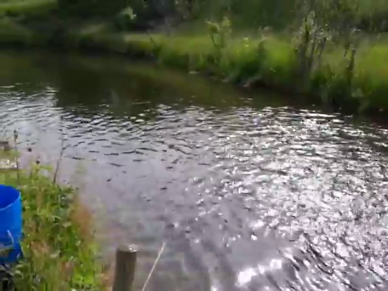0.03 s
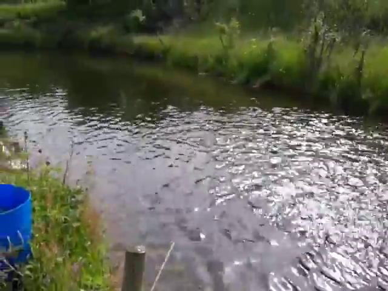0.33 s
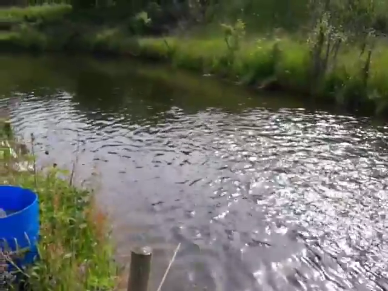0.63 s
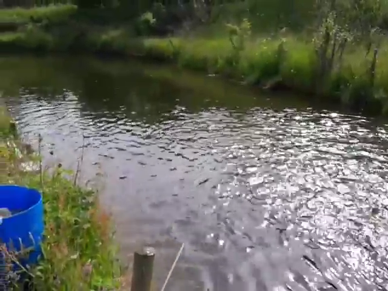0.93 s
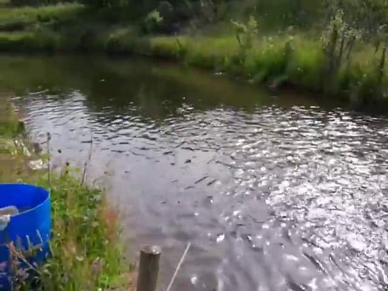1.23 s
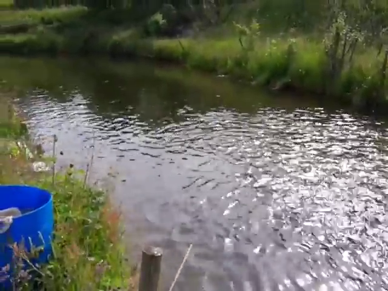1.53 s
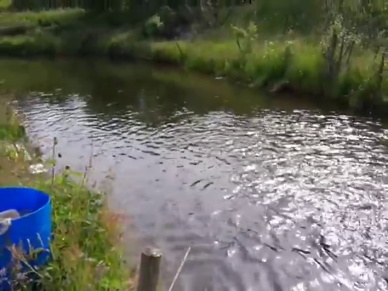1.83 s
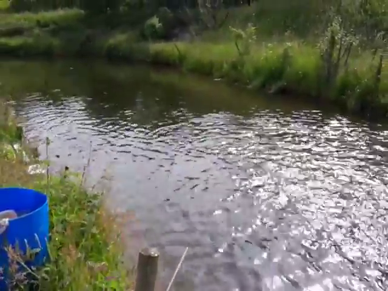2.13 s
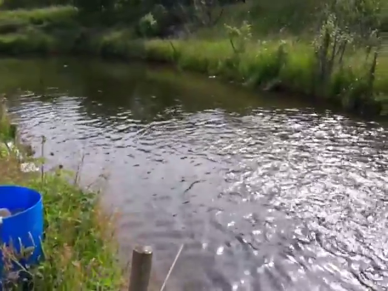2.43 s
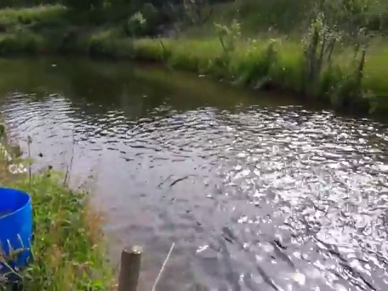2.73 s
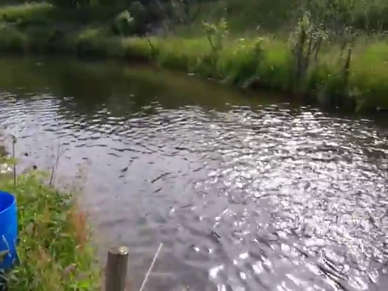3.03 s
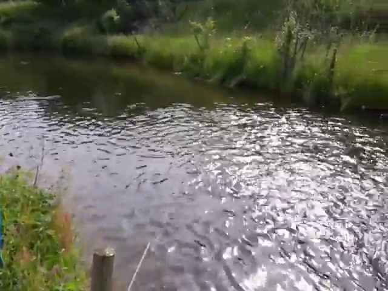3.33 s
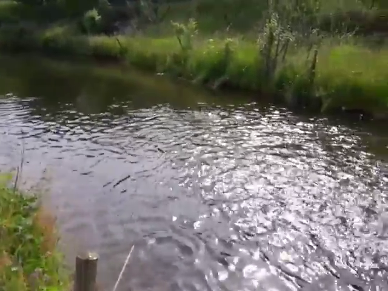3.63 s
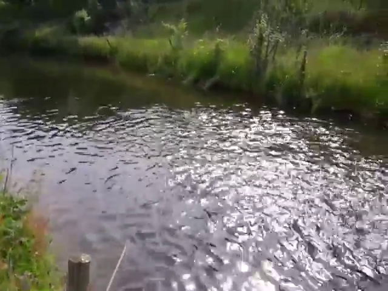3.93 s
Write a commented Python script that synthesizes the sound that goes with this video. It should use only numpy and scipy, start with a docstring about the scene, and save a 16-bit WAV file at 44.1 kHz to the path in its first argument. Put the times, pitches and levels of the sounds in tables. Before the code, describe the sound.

A steady rush of splashing water comes from an aerator on the right of an outdoor pond. Its motor drones underneath with occasional soft gurgles, while wind rumbles on the left of the microphone, thumping early and again near the end.

```python
"""By a pond in the open air, stereo microphone, a paddlewheel aerator off to the right.
From the start its spray and bubbles rush steadily, bright hiss on top, the drive humming underneath.
Air pockets dragged under by the paddles gurgle through the first second. A breeze buffets mostly the
left side of the microphone, thumping around 1 s and hardest near 1.7 s. The gurgles return from 2.2 s,
and the wind thumps once more near 3.5 s while the wheel churns on."""
import sys
import numpy as np
from scipy import signal
from scipy.fft import rfft, irfft
from scipy.io import wavfile

SR = 44100
rng = np.random.default_rng(int(sys.argv[2]) if len(sys.argv) > 2 else 0)


def materialize(psi):
    """Save the field psi as 16-bit PCM at rate SR to the path in sys.argv[1].

    A 1-D psi becomes a single channel; in a 2-D psi each row is a channel.
    """
    bounded = np.clip(np.atleast_2d(psi).T, -1, 1)
    quanta = np.round(bounded * 32767).astype(np.int16)
    wavfile.write(sys.argv[1], SR, quanta)


N = 176400
TIME = np.arange(N) / SR
BIN_HZ = np.maximum(np.arange(N // 2 + 1) * SR / N, 1)

# Churning water on the right of the microphone. Each row: frequency in Hz, relative level in dB.
WATER_SPECTRUM = [(40, -71), (120, -58.5), (240, -56.5), (300, -57), (375, -56.5), (480, -60), (560, -64.5),
                  (660, -65.5), (810, -63), (950, -63.5), (1200, -63.5), (1620, -66.5), (2150, -65),
                  (2900, -69), (4000, -71.5), (4550, -68), (5100, -68.5), (6000, -73.5), (7400, -74),
                  (8500, -63.5), (9400, -53), (10050, -49.5), (11000, -56), (13300, -63.5), (15600, -67)]
# The left side faces away from the wheel. Each row: frequency in Hz, level against the right in dB.
LEFT_SHADOW = [(200, -0.5), (370, -2.2), (540, 1), (950, -0.5), (1650, 2.0), (2000, -2.5), (2420, -12.5),
               (2850, -2.5), (3500, 1), (4000, -1), (4850, -15), (6000, -6), (7200, -3), (7700, -4),
               (8100, -13.5), (10000, -13.5), (11500, -8.5), (12400, -10.5), (13200, -9), (14200, -8),
               (15600, -7)]
# The path round the microphone body to its left side. Each row: frequency in Hz, phase turn in radians.
LEFT_PHASE = [(250, -0.14), (430, 0.56), (620, 0.07), (1500, -0.13), (2380, -2), (2460, 1.3), (2850, 0.89),
              (3300, 0.2), (3700, 0.03), (4600, -1.26), (5300, 1.4), (6700, 1.2), (7700, -1.8), (8300, 3),
              (9200, 1), (10300, 0.8), (11800, 0.7), (14000, -1.5)]
# Water sound common to both sides. Each row: frequency in Hz, share of the power from 0 to 1.
COMMON_SHARE = [(150, 0.3), (240, 0.89), (370, 0.93), (600, 0.79), (1000, 0.85), (1320, 0.97), (1650, 0.86),
                (2150, 0.69), (2420, 0.04), (2650, 0.24), (3100, 0.82), (3600, 0.5), (4020, 0.89),
                (4400, 0.72), (6200, 0.12), (7050, 0.42), (8000, 0), (9700, 0.23), (15000, 0)]
# Large air pockets under the paddles. Each row: time in seconds, peak level in dB, starting pitch in Hz.
AIR_POCKETS = [(.249, -24, 463), (.452, -25, 409), (.672, -29, 470), (0.76, -21.5, 377), (0.962, -24, 400),
               (1.079, -24.5, 430), (2.187, -21.5, 368), (2.798, -28, 383), (2.912, -25.5, 421),
               (3.398, -28, 383), (3.745, -29, 446)]
# The motor's hum. Each row: frequency in Hz, level on the left in dB, level on the right in dB.
HUM_LINES = [(101, -45, -40.5), (195.2, -48, -43.5), (600, -61, -58)]
# The gear drone on the right. Each row: time in seconds, level in dB.
DRONE_LEVEL = [(0, -44.5), (.33, -36.5), (.57, -34), (.8, -39.5), (1.25, -37), (1.45, -44), (1.62, -36),
               (2.0, -39), (2.22, -35), (2.55, -33), (2.7, -38), (2.93, -38), (3.05, -49), (3.4, -37),
               (3.68, -50), (3.82, -37), (4, -40)]
# Wind on the microphone's left port. Each row: time in seconds, level in dB.
LEFT_BREEZE = [(0, -33), (.25, -28), (.66, -29), (.73, -25.5), (.84, -28.5), (.92, -25.5), (1.02, -27),
               (1.16, -25), (1.38, -31), (1.5, -22.5), (1.6, -22), (1.65, -16), (1.77, -21), (1.8, -27.5),
               (2.3, -31), (2.58, -27.5), (2.85, -33), (3.15, -30), (3.6, -29.5), (3.85, -26.5), (4, -33)]
# Single eddies hitting the left port. Each row: time in seconds, peak level in dB, pitch in Hz.
EDDY_THUMPS = [(0.761, -8, 129), (0.892, -11, 107), (1.051, -11.5, 102), (1.667, -11, 131),
               (1.732, -6, 125), (1.766, -8, 139), (3.468, -7.5, 133), (3.508, -15.5, 115)]

WATER_DB, LEFT_LAG_MS = -18, 0.3637
SURGE_DB, SURGE_PER_S = 0.72, 1.8   # the wheel throws more or less water
SLOP_DB, SLOP_PER_S = 0.49, 24   # single sheets of water come down
DROPS_PER_S, DROP_SPREAD_DB, DROPS_DB = 6000, 3, -1.5   # level against the smooth rush
BUBBLES_PER_S, BUBBLE_SPREAD_DB, BUBBLES_DB = 1500, 0.5, -1.5
BUBBLE_LOW_HZ, BUBBLE_HIGH_HZ, BUBBLE_CYCLES = 445.8, 5552, 65   # cycles to fade by 60 dB
GULP_TOP_HZ, GULP_DB, GULP_PER_S = 700, 1.0, 25
PATTER_TOP_HZ, PATTER_DB, PATTER_PER_S = 3800, 0.67, 17
GURGLE_ATTACK_S, GURGLE_DECAY_S, GURGLE_RISE_PER_S = 0.0031, 0.011, 3
DRONE_HZ, DRONE_WANDER_HZ, DRONE_FLUTTER_DB = 340.2, 1.87, 1.5
SHUDDER_DEPTH, SHUDDER_PER_S = .16, 14
WIND_LOW_HZ, WIND_HIGH_HZ, WIND_LUMPS_DB = 57.4, 148.6, 2
RIGHT_WIND_DB, RIGHT_FOLLOWS = -36, 0.33   # at mean breeze; share of the left side's swing
EDDY_CYCLES = 0.73   # half the length of a thump, in cycles of its pitch
CUTOFF_HZ = 15780


def water():
    """The wheel's splashing reaches the microphone's right side first, the left later and shaded."""
    share = np.clip(per_bin(COMMON_SHARE), 0, 1)
    common = np.sqrt(share) * splashing()
    colour = from_db(per_bin(WATER_SPECTRUM))
    left, right = [colour * (common + np.sqrt(1 - share) * splashing()) for _ in range(2)]
    phase = per_bin(LEFT_PHASE) - 2 * np.pi * BIN_HZ * LEFT_LAG_MS / 1000
    left = left * from_db(per_bin(LEFT_SHADOW)) * np.exp(1j * phase)
    pair = churning(np.array([left, right]))
    level_db = WATER_DB + SURGE_DB * drift(SURGE_PER_S) + SLOP_DB * drift(SLOP_PER_S)
    return pair / pair[1].std() * from_db(level_db)


def splashing():
    """Spray lands on the pond: the spectrum of rush, drop impacts and bubbles, at even power per Hz."""
    drops = from_db(DROPS_DB) * rms_one(clicks(DROPS_PER_S, DROP_SPREAD_DB))
    spray = rng.standard_normal(N) + drops + from_db(BUBBLES_DB) * bubbles()
    bubble_band = (BIN_HZ > BUBBLE_LOW_HZ) & (BIN_HZ < BUBBLE_HIGH_HZ)
    power = 1 + from_db(DROPS_DB) ** 2 + bubble_band * from_db(BUBBLES_DB) ** 2
    return rfft(spray) / np.sqrt(power)


def bubbles(sizes=64):
    """Bubbles ring briefly, each size at its own pitch; together their spectrum is level."""
    kicks = clicks(BUBBLES_PER_S, BUBBLE_SPREAD_DB)
    size_of_kick = rng.integers(0, sizes, N)
    ringing = 0
    for size, hz in enumerate(np.geomspace(BUBBLE_LOW_HZ, BUBBLE_HIGH_HZ, sizes)):
        decay = np.exp(-np.log(1000) * hz / (BUBBLE_CYCLES * SR))
        poles = [1, -2 * decay * np.cos(2 * np.pi * hz / SR), decay * decay]
        ringing += hz * signal.lfilter([1, 0, -1], poles, kicks * (size_of_kick == size) + 1e-18)
    return rms_one(ringing) * np.sqrt(2 * (BUBBLE_HIGH_HZ - BUBBLE_LOW_HZ) / SR)


def churning(spectrum):
    """The low splashing swells in gulps as the paddles dig in; above it, drops patter in bunches."""
    low, low_and_mid = [irfft(spectrum / (1 + (BIN_HZ / hz) ** 4), N)
                        for hz in (GULP_TOP_HZ, PATTER_TOP_HZ)]
    gulps = rms_one(from_db(GULP_DB * drift(GULP_PER_S)))
    bunches = rms_one(from_db(PATTER_DB * drift(PATTER_PER_S)))
    hiss = irfft(spectrum, N) - low_and_mid
    return low * gulps + (low_and_mid - low) * bunches + hiss


def gurgles():
    """Each air pocket rings and rises in pitch as it nears the surface; the left side hears it later."""
    pair = np.zeros((2, N))
    heard = TIME - np.array([[LEFT_LAG_MS / 1000], [0]])
    for at_s, db, hz in AIR_POCKETS:
        age = np.maximum(heard - at_s + GURGLE_ATTACK_S, 0)
        envelope = np.minimum(age / GURGLE_ATTACK_S, np.exp((GURGLE_ATTACK_S - age) / GURGLE_DECAY_S))
        cycles = hz * age * (1 + GURGLE_RISE_PER_S * age / 2)
        pair += from_db(db) * envelope * np.sin(2 * np.pi * (cycles + rng.random()))
    return pair


def wind():
    """Right at the microphone, the breeze rumbles on each port and single eddies thump on the left."""
    band = signal.butter(2, [WIND_LOW_HZ, WIND_HIGH_HZ], "band", fs=SR, output="sos")
    left_db = in_time(LEFT_BREEZE)
    right_db = RIGHT_WIND_DB + RIGHT_FOLLOWS * (left_db - left_db.mean())
    ports = []
    for db in (left_db, right_db):
        rumble = signal.sosfilt(band, rng.standard_normal(N))
        lumps = from_db(WIND_LUMPS_DB * drift(20))
        ports.append(from_db(db) * rms_one(rumble * lumps))
    for at_s, db, hz in EDDY_THUMPS:
        cycles = hz * (TIME - at_s)
        envelope = np.exp(-(cycles / EDDY_CYCLES) ** 2)
        ports[0] += from_db(db) * envelope * np.sin(2 * np.pi * (cycles + rng.random()))
    return np.array(ports)


def motor():
    """Out at the wheel, the motor hums steadily and the gear drone wavers under changing load."""
    hum = sum(from_db([[left], [right]]) * np.sin(2 * np.pi * (hz * TIME + rng.random()))
              for hz, left, right in HUM_LINES)
    cycles = np.cumsum(DRONE_HZ + DRONE_WANDER_HZ * drift(7.2)) / SR
    lag_cycles = np.array([[DRONE_HZ * LEFT_LAG_MS / 1000], [0]])
    level_db = in_time(DRONE_LEVEL) + DRONE_FLUTTER_DB * drift(12.0)
    drone = from_db(level_db) * np.sin(2 * np.pi * (cycles - lag_cycles))
    shudder = 1 + SHUDDER_DEPTH * drift(SHUDDER_PER_S)
    balance = from_db([[-1.2], [0]])
    return np.sqrt(2) * (hum + drone * shudder * balance)


def clicks(per_s, spread_db):
    """Random clicks, many small and a few large."""
    heights = from_db(spread_db * np.minimum(rng.exponential(1, N), 5)) * rng.choice([-1, 1], N)
    return heights * (rng.random(N) < per_s / SR)


def drift(rate_hz):
    """A smooth random wander with a spread of about 1, mostly slower than the given rate."""
    hop, settle = 40, 2000
    pole = np.exp(-2 * np.pi * rate_hz * hop / SR)
    noise = rng.standard_normal(N // hop + settle + 2)
    slow = signal.lfilter([1], [1, -2 * pole, pole * pole], noise)[settle:]
    return np.interp(np.arange(N) / hop, np.arange(len(slow)), rms_one(slow))


def from_db(db):
    """Decibels to gain."""
    return 10 ** (np.asarray(db) / 20)


def rms_one(x):
    """Scale to unit power."""
    return x / np.sqrt(np.mean(x ** 2) + 1e-20)


def in_time(rows):
    """A control curve at every sample."""
    return np.interp(TIME, *np.transpose(rows))


def per_bin(rows):
    """A spectrum table at every frequency bin."""
    hz, value = np.transpose(rows)
    return np.interp(np.log(BIN_HZ), np.log(hz), value)


def scene():
    """The aerator and the breeze as they reach the microphone by the pond."""
    return water() + motor() + wind() + gurgles()


def record(dry):
    """The microphone's signal is cut steeply at the top of the treble."""
    return signal.sosfilt(signal.ellip(12, .1, 80, CUTOFF_HZ, fs=SR, output="sos"), dry)


dry = scene()
out = record(dry)
materialize(out)
```